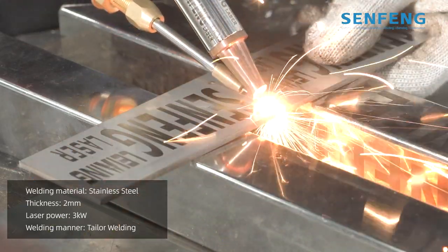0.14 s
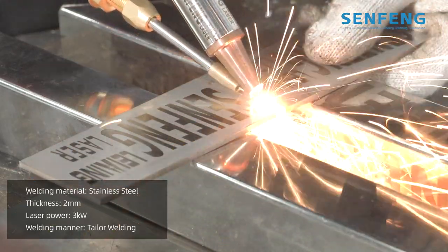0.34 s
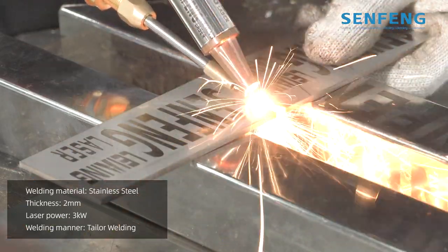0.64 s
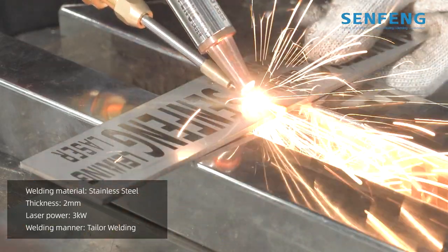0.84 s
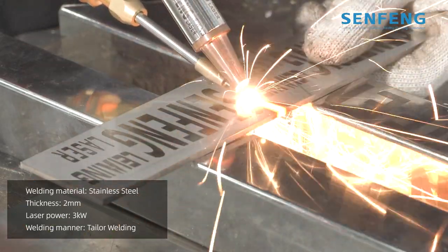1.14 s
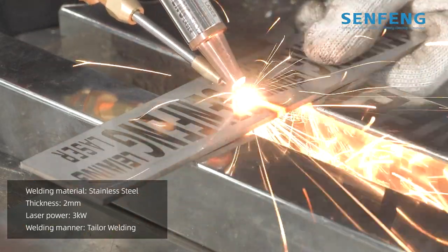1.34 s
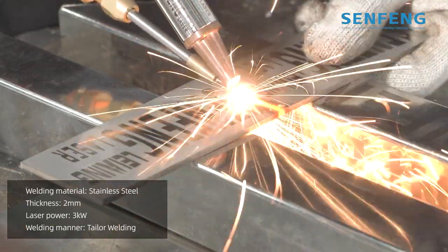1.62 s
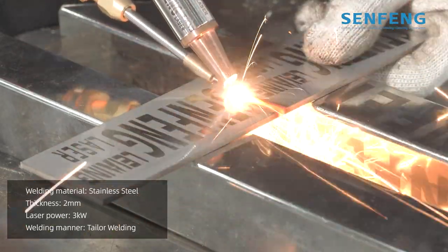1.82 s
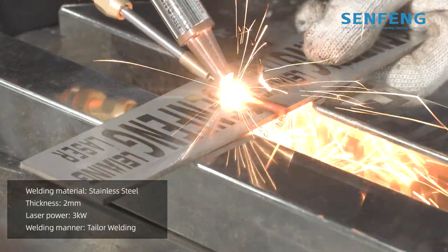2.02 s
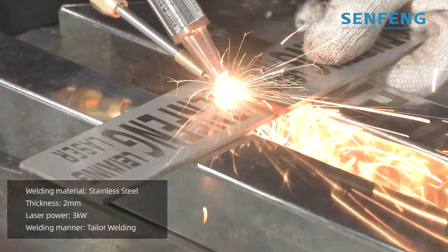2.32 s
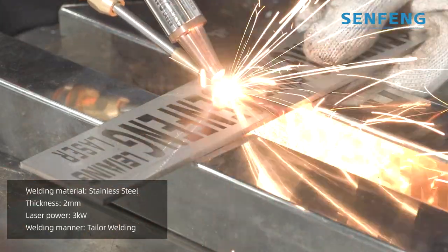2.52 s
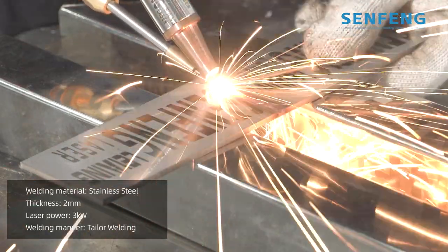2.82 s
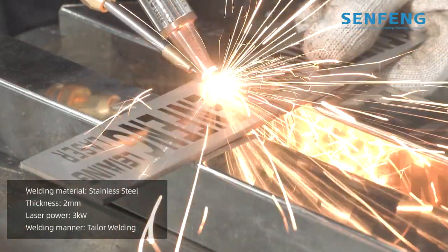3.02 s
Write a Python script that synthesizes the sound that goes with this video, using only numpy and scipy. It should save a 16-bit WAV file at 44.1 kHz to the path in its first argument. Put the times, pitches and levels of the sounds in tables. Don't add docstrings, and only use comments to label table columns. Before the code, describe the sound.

Steady bright hiss and rapid crackly buzz of a hand-held welding torch on thin steel, close up

```python
import sys
import numpy as np
from scipy import signal
from scipy.fft import rfft, irfft
from scipy.io import wavfile
from scipy.ndimage import uniform_filter1d

SR = 44100
rng = np.random.default_rng(int(sys.argv[2]) if len(sys.argv) > 2 else 0)


def boost_factor(decibels):
    exponent = np.asarray(decibels, float) / 20
    return 10 ** exponent


def wrap_up_sound(samples):
    columns = np.atleast_2d(samples).T
    tamed = np.clip(columns, -1, 1)
    steps = np.round(tamed * 32767).astype(np.int16)
    wavfile.write(sys.argv[1], SR, steps)


N = 139356
T = np.arange(N) / SR
F = np.fft.rfftfreq(N, 1 / SR)

# frequency_hz, density_db [dB per Hz]
SHOP_SPECTRUM = [(30, -50), (150, -21), (350, -7), (500, -5), (900, -4), (1600, -2), (3000, -11),
                 (4500, -17)]
# time_s, left_db, right_db
WHINE_LEVEL = [(0, -70, -70), (.6, -68, -68), (.7, -53, -57), (.9, -50, -53), (1.1, -56, -52),
               (1.27, -57, -45), (1.55, -58, -48), (1.75, -60, -51), (1.9, -63, -57), (2.3, -68, -62)]
# frequency_hz, density_db [dB per Hz]
EDDY_SPECTRUM = [(24, -63), (40, -37), (225, -2.5), (355, 3.5), (446, 2.5), (770, -2.5), (996, -8),
                 (1190, -4.5), (1500, -17), (1950, -51), (3300, -120)]
# frequency_hz, density_db [dB per Hz]
RUMBLE_SPECTRUM = [(22, -30), (45, -20), (80, -12), (130, -7.5), (200, 1), (300, -3.5), (500, -43)]
# time_s, level_db
GUST_LEVEL = [(0, -50.5), (.2, -52), (.32, -56), (.6, -61.5), (.75, -50), (1.0, -45), (1.12, -48),
              (1.3, -48), (1.5, -52.5), (1.8, -63), (1.9, -48), (2.06, -50), (2.15, -49), (2.4, -45),
              (2.5, -59.5), (2.74, -51), (2.8, -45), (3.16, -41.5)]
# peak_s, level_db, length_s
AIR_THUMPS = [(0.172, -44.5, 0.026), (0.891, -38.5, 0.006), (0.955, -43, 0.0096), (1.055, -42.5, 0.038),
              (1.185, -45, .012), (1.238, -41, .006), (1.246, -32.5, 0.0075), (1.266, -37.5, 0.0085),
              (1.31, -45.5, 0.014), (1.361, -36, 0.0034), (1.619, -44, 0.0064), (1.923, -42.5, 0.011),
              (1.977, -40, 0.013), (2.031, -38, 0.019), (2.15, -51, 0.0075), (2.225, -36.5, 0.014),
              (2.312, -51, 0.015), (2.38, -57, 0.018), (2.808, -39.5, 0.014), (2.842, -39, 0.011),
              (2.909, -39, 0.0073), (2.935, -51, 0.0067), (2.976, -56, 0.0053), (2.995, -40, 0.013),
              (3.024, -46, .007), (3.059, -37.5, .008), (3.076, -40, 0.0065)]
# frequency_hz, density_db [dB per Hz]
MELT_SPECTRUM = [(800, -18.5), (1600, -32), (2200, -10.5), (3600, -6), (5000, -8), (7000, -3.5),
                 (9500, -4.5), (13000, -11)]
# time_s, level_db
MELT_LEVEL = [(0, -36), (.5, -34), (1.0, -32.5), (1.3, -34), (1.8, -32.5), (2.2, -33), (2.5, -29.5),
              (2.8, -31), (3.05, -31), (3.16, -31.5)]
# frequency_hz, density_db [dB per Hz]
GAS_SPECTRUM = [(1500, -33), (3500, -14.5), (5000, -5), (8000, -3.5), (10500, -0.5), (12000, -1),
                (14000, -0.5), (16000, 2)]
# time_s, level_db
GAS_FLOW = [(0, 0), (.7, -0.5), (1.1, -0.5), (1.3, 2), (1.9, -0.1), (2.4, 1), (2.8, 0), (3.16, 1)]
# time_s, travel [0-1]
TORCH_TRAVEL = [(0, 0.2), (.8, 0.64), (1.3, 0.9), (1.85, 0.9), (2.4, 1), (3.16, 1)]
# start_delay_ms, end_delay_ms, start_share, end_share
LEFT_ECHOES = [(0.259, 0.268, -0.19, -0.11), (0.339, 0.326, -0.13, -0.04), (0.542, 0.544, -0.13, -0.13),
               (0.795, 0.806, 0.08, 0.07), (0.937, 0.937, 0.12, 0.12), (1.031, 1.019, 0.1, 0.11),
               (1.107, 1.1, 0.13, 0.03), (1.19, 1.182, 0.24, 0.36), (1.355, 1.349, -0.18, -0.12),
               (1.576, 1.561, 0.08, 0.06)]
RIGHT_ECHOES = [(0.261, 0.276, -0.23, -0.1), (0.343, 0.333, -0.18, -0.07), (0.476, 0.484, -0.1, -0.09),
                (0.549, 0.532, -0.08, -0.08), (0.873, 0.873, -0.1, -0.06), (1.071, 1.065, -0.11, -0.08),
                (1.147, 1.127, -0.05, -0.14), (1.209, 1.199, 0.25, 0.34), (1.259, 1.25, -0.11, -0.16),
                (1.446, 1.44, 0.14, 0.04)]
# frequency_hz, difference_db
PORT_DIFFERENCE = [(1000, -13), (2400, -3), (4400, 1.5), (8000, -3), (11000, -1), (13000, 0.5),
                   (15500, 5.5)]
# frequency_hz, width_hz, depth [0-1]
NARROW_DIPS = [(3000, 90, .3), (3660, 110, .6), (4520, 100, .35), (7150, 90, .35), (12150, 200, .35)]

GAS_DB = -28.5
SWING_HZ = 68.03


def curve(table, axis=1):
    columns = np.array(table).T
    return np.interp(T, columns[0], columns[axis])


def unit(x):
    return x / np.sqrt(np.mean(x ** 2))


def walk(rate_hz):
    hold = int(SR / rate_hz)
    steps = np.repeat(rng.standard_normal(N // hold + 1), hold)
    smooth = uniform_filter1d(uniform_filter1d(steps, hold), hold)[:N]
    return smooth / np.std(smooth)


def noise_spectrum(table):
    hz, db = np.array(table).T
    log_f, log_hz = np.log(F + 1), np.log(hz)
    beyond = abs(log_f - np.clip(log_f, log_hz[0], log_hz[-1]))
    gain_db = np.interp(log_f, log_hz, db) - 30 * beyond
    z = rfft(rng.standard_normal(N)) * boost_factor(gain_db)
    return z / np.std(irfft(z, N))


def flicker(table, depth_db, rate_hz):
    z = noise_spectrum(table)
    half_octave = 2 * np.log2(F + 1)
    total = np.zeros(N)
    for k in range(9, 30):
        band = irfft(z * np.clip(1 - abs(half_octave - k), 0, 1), N)
        total += band * boost_factor(depth_db * walk(rate_hz))
    return total


def shop():
    shared, left, right = (flicker(SHOP_SPECTRUM, 0.57, 6.1) for _ in range(3))
    apart = irfft(rfft(np.array([left, 1.27 * right])) * F / (F + 600), N)
    return boost_factor(-40.5) * unit(1.06 * shared + 1.19 * apart)


def whine():
    phase = 2 * np.pi * np.cumsum(1640.5 + 1.51 * walk(3.7)) / SR
    lead_rad, flutter_db = 2.4, 1.2
    left = boost_factor(curve(WHINE_LEVEL, axis=1) + flutter_db * walk(13.7)) * np.sin(phase + lead_rad)
    right = boost_factor(curve(WHINE_LEVEL, axis=2) + flutter_db * walk(13.6)) * np.sin(phase)
    return np.sqrt(2) * np.array([left, right])


def at_ports(left, right):
    pan_db, lead_rad, knee_hz = -1, 1.8, 156
    lag = np.exp(-1j * lead_rad * F / (F + knee_hz))
    return irfft(np.array([left * boost_factor(pan_db / 2), right * lag * boost_factor(-pan_db / 2)]), N)


def wind():
    alike = 0.95
    left, other = noise_spectrum(EDDY_SPECTRUM), noise_spectrum(EDDY_SPECTRUM)
    right = alike * left + np.sqrt(1 - alike ** 2) * other
    slow = boost_factor(curve(GUST_LEVEL))
    gust = slow * boost_factor(-0.5) * unit(boost_factor(-0.5 * walk(70)))
    for peak_s, level_db, length_s in AIR_THUMPS:
        gust = gust + boost_factor(level_db) * np.exp(-((T - peak_s) / length_s) ** 2)
    low = noise_spectrum(RUMBLE_SPECTRUM)
    rumble = at_ports(low, low) * boost_factor(-9.5) * uniform_filter1d(slow, int(0.084 * SR))
    return at_ports(left, right) * gust + rumble


def hall():
    def port():
        gas_part = irfft(noise_spectrum(GAS_SPECTRUM), N) * boost_factor(GAS_DB + curve(GAS_FLOW))
        melt_part = irfft(noise_spectrum(MELT_SPECTRUM), N) * boost_factor(curve(MELT_LEVEL))
        return gas_part + melt_part
    return np.array([port(), port()])


def delay(ms):
    return np.exp(-2j * np.pi * F * ms / 1000)


def echoes(x):
    hz, difference_db = np.array(PORT_DIFFERENCE).T
    pan_db = np.interp(np.log(F + 1), np.log(hz), difference_db) / 2
    right_lag = delay(0.012) * np.exp(-0.8j / (1 + (F / 3600) ** 6))
    direct = rfft(x) * np.array([boost_factor(pan_db), boost_factor(-pan_db) * right_lag])

    def mirrored(k):
        combs = [1 + boost_factor(3) * sum(echo[k + 2] * delay(echo[k]) for echo in port)
                 for port in (LEFT_ECHOES, RIGHT_ECHOES)]
        return irfft(direct * np.array(combs), N)

    start, end = mirrored(0), mirrored(1)
    position = curve(TORCH_TRAVEL) + 0.2 * walk(5.27)
    return start + position * (end - start)


def swing():
    duck_db, sharpness, delay_s = 3, 1.44, 0.0116
    cycle = np.cos(2 * np.pi * SWING_HZ * (T - delay_s))
    return boost_factor(-duck_db * np.exp(sharpness * (cycle - 1)))


def melt():
    burst_s, low_lag_s = 0.0009, 0.0012
    z = rfft(flicker(MELT_SPECTRUM, 1.6, 6.6))
    low_share = 1 / (1 + (F / 3700) ** 8)
    size_db = 4.5 + 1.5 * walk(90)

    def burst(delay_s):
        return unit(boost_factor(size_db * np.cos(4 * np.pi * SWING_HZ * (T - delay_s))))

    lows = irfft(z * low_share, N) * burst(burst_s + low_lag_s)
    highs = irfft(z * (1 - low_share), N) * burst(burst_s)
    return (lows + highs) * boost_factor(curve(MELT_LEVEL)) * swing()


def gas():
    level_db = GAS_DB + curve(GAS_FLOW) + 0.35 * walk(40.6)
    return flicker(GAS_SPECTRUM, 1.0, 9.16) * boost_factor(level_db) * swing()


def scene():
    torch = echoes(gas() + melt() + boost_factor(-10) * hall())
    return torch + boost_factor(-17) * hall() + wind() + shop() + whine()


def band_limit(x):
    return signal.sosfilt(signal.butter(12, 16250, fs=SR, output="sos"), x)


def record(dry):
    bass_cut = signal.butter(2, 91, "high", fs=SR, output="sos")
    response = np.clip((15770 - F) / 60, 0, 1)
    for hz, width_hz, depth in NARROW_DIPS:
        response = response * (1 - np.clip(depth, 0, 1) * np.exp(-((F - hz) / width_hz) ** 2))
    mix = irfft(rfft(signal.sosfilt(bass_cut, dry)) * response, N)
    return band_limit(mix)


dry = scene()
out = record(dry)
wrap_up_sound(out)
```